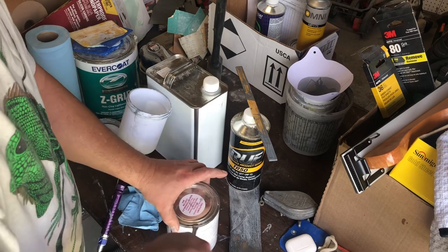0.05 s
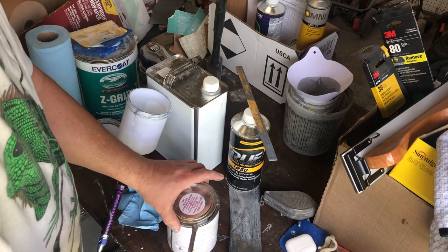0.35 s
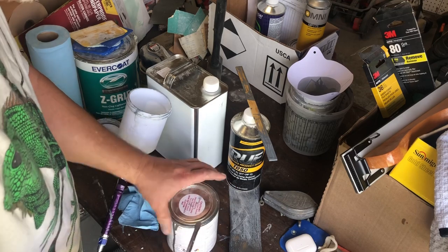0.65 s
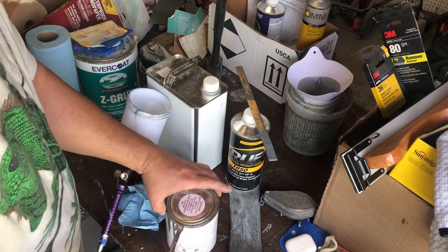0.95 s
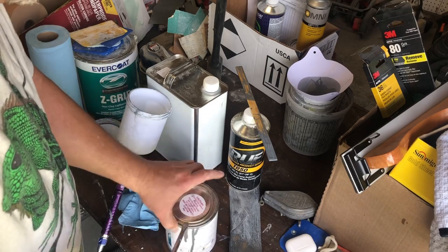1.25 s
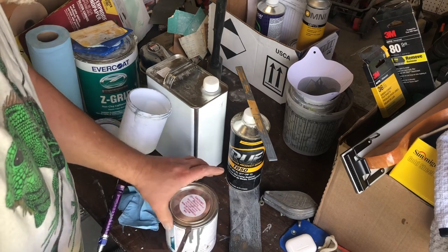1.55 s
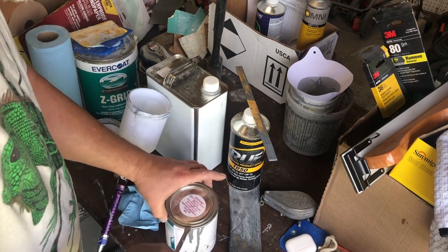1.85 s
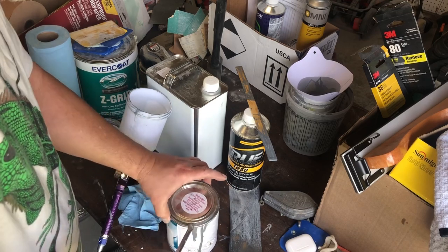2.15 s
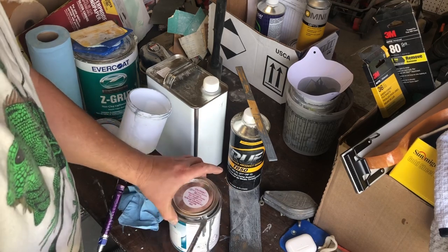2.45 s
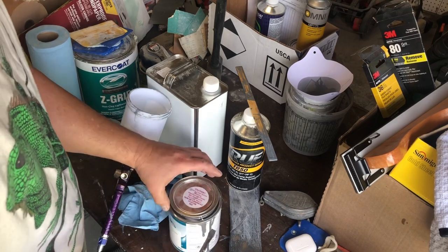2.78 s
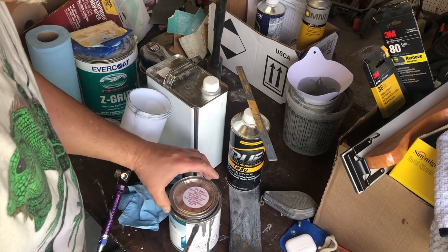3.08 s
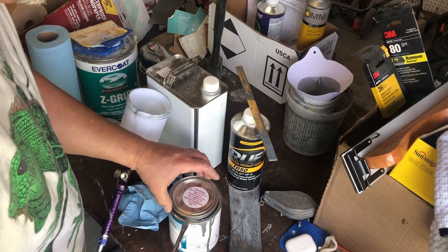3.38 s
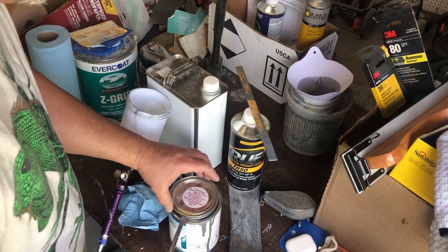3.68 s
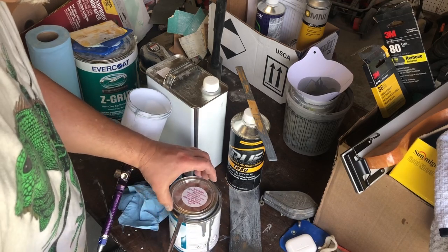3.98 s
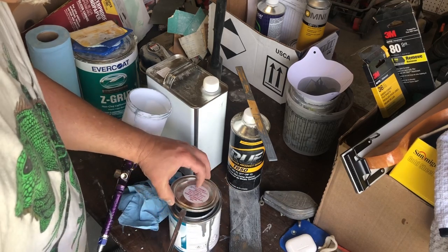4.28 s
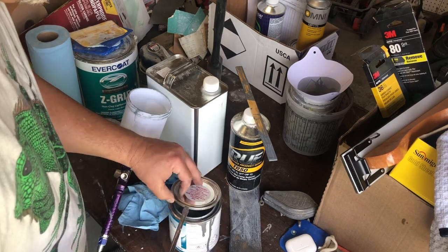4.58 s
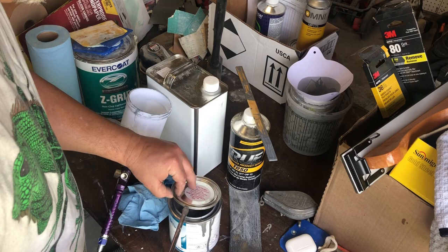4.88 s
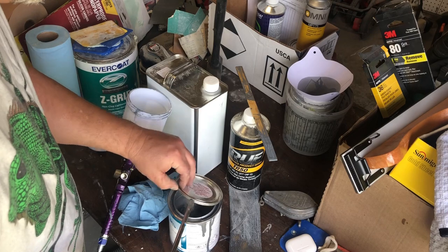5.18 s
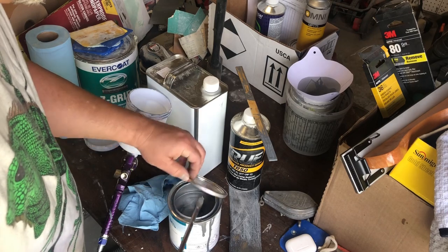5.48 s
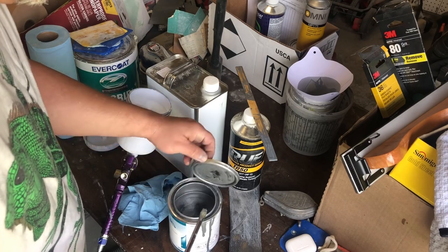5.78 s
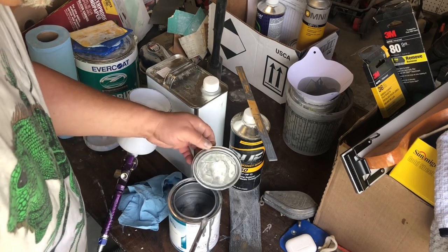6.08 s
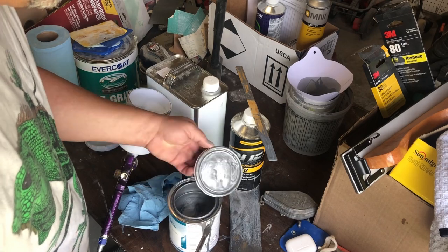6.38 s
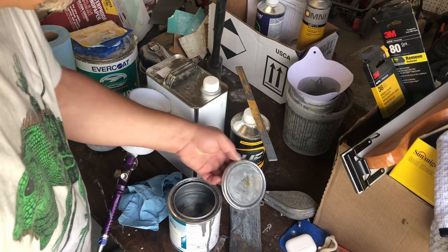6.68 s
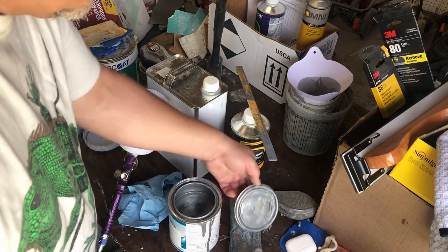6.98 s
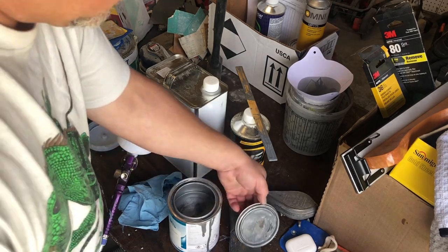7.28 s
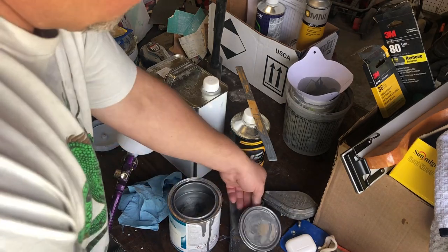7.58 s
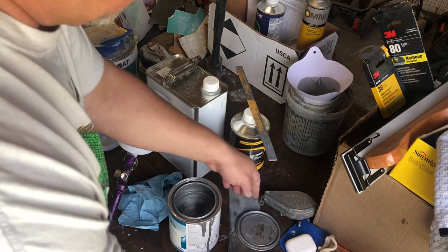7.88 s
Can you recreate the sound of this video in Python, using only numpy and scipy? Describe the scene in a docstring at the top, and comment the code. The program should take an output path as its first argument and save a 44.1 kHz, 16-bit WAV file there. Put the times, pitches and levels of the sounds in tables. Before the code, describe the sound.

Soft scrapes and bumps of a small tin on wood, a faint tacky crackle, then a metal lid clattering down.

```python
"""A small metal paint can is twisted round on a cluttered workbench, scraping and bumping on the wood.
Fingers slip and squeak on the tin as they work the sticky lid loose, and the tacky paint crackles.
The lid slides onto the bench and drops with a ringing clatter. A sleeve brushes softly, and the
open workshop adds a short echo over a quiet outdoor rumble."""
import sys
import numpy as np
from scipy import signal
from scipy.fft import rfft, irfft
from scipy.io import wavfile

SR = 44100
rng = np.random.default_rng(int(sys.argv[2]) if len(sys.argv) > 2 else 0)


def dump_mix(stems):
    """Bounce the given channels to the path in sys.argv[1] as a 16-bit WAV at rate SR."""
    frames = np.atleast_2d(stems).T  # one column per channel
    limited = np.clip(frames, -1, 1)  # hard clip at full scale
    pcm = np.round(limited * 32767).astype(np.int16)
    wavfile.write(sys.argv[1], SR, pcm)


N = 358974


def from_db(db):
    """Turn decibels into a gain to multiply by."""
    return 10 ** (np.asarray(db) / 20)


def unit_power(x):
    """Scale a sound so that its average power is one."""
    return x / np.sqrt(np.mean(x ** 2) + 1e-30)


def frequencies(size):
    """The frequencies in a sound of this many samples, kept above zero."""
    return np.maximum(np.arange(size // 2 + 1) * SR / size, 1)


def tone_curve(points, hz):
    """Gain at each frequency, along a line through (pitch_hz, level_db) points."""
    pitch_hz, level_db = np.transpose(points)
    return from_db(np.interp(np.log(hz), np.log(pitch_hz), level_db))


def resonances(peaks, hz):
    """Gain of an object that favours some pitches, given as (pitch_hz, width_hz, level_db)."""
    return np.sqrt(sum(from_db(db) ** 2 / (1 + ((hz ** 2 - pitch ** 2) / (hz * width)) ** 2)
                       for pitch, width, db in peaks))


def filtered(x, tone):
    """Give a steady sound a tone (a gain per frequency), at unit power."""
    return unit_power(irfft(rfft(x) * tone, len(x)))


def drift(per_s):
    """A random wander around zero, about one unit either way."""
    points = rng.standard_normal(4000)
    return np.interp(np.arange(N) / SR * per_s, np.arange(len(points)), points)


def add(out, start_s, sound):
    """Mix a sound in at a given time."""
    at = max(int(start_s * SR), 0)
    out[at:at + len(sound)] += sound[:max(N - at, 0)]


def onset(rise_s):
    """One second of gain that rises from zero as a sound begins."""
    return 1 - np.exp(-np.arange(SR) / SR / rise_s)


def gesture(start_s, length_s, swell_db, attack_s, fade_db_per_s):
    """Gain of one movement: it fades in, swells or sags while it lasts, then dies away."""
    t = np.arange(N) / SR - start_s
    db = swell_db * np.clip(t / length_s, 0, 1) - fade_db_per_s * np.maximum(t - length_s, 0)
    return np.clip(t / attack_s, 0, 1) * from_db(np.maximum(db, -200))


def friction(per_s, spread_db):
    """Rubbing surfaces make tiny catches of uneven size at random moments."""
    sizes = from_db(spread_db * np.minimum(rng.exponential(1, N), 4)) * rng.standard_normal(N)
    return sizes * (rng.random(N) < per_s / SR)


def noisy_ring(tone, ring_s, damping):
    """Countless close notes fade 60 dB in ring_s at 1 kHz; damping makes higher ones fade sooner."""
    out, t = 0, np.arange(SR) / SR
    octave = np.log2(frequencies(SR) / 1000)
    spectrum = rfft(filtered(rng.standard_normal(SR), tone))
    for k in range(-5, 5):
        band = irfft(spectrum * np.maximum(1 - abs(octave - k), 0), SR)
        decay = from_db(-60 * t * 2 ** (k * damping) / ring_s)
        share = np.std(band) * np.sqrt(np.mean(decay ** 2))
        out = out + share * unit_power(band * decay)
    return out * np.sqrt(ring_s * SR / np.log(1e6) / np.sum(out ** 2))   # starts near unit power


# the tone of still air: pitch_hz, level_db
AIR_TONE = [(15, -21.5), (25, -18), (59, 0), (123, -1), (242, -9.5), (503, -12.5), (1070, -18), (2840, -28),
            (3340, -27.5), (14400, -33), (16000, -35)]
# the deep notes of the far rumble: pitch_hz, width_hz, level_db
RUMBLE_PEAKS = [(57.9, 18, -2), (119, 9.2, 2), (164, 51, -7.5), (239, 4.9, 0), (288.5, 30, -8)]
def outdoors(air_db=-64.5, rumble_db=-66.5, waver_db=2.0, surge_db=-65.5):
    """Still air and a far, wavering rumble with one long surge."""
    hz = frequencies(N)
    low_cut = 1 / np.hypot(1, (36 / hz) ** 5)
    air = from_db(air_db) * filtered(rng.standard_normal(N), tone_curve(AIR_TONE, hz) * low_cut)
    far_tone = resonances(RUMBLE_PEAKS, hz) * low_cut / np.hypot(1, (hz / 400) ** 2)
    rumble = from_db(rumble_db + waver_db * drift(per_s=7.4)) * filtered(rng.standard_normal(N), far_tone)
    surge = gesture(start_s=4.95, length_s=1.38, swell_db=-3, attack_s=0.067, fade_db_per_s=17)
    drone = filtered(rng.standard_normal(N), resonances([(213, 100, 0)], hz) ** 2)
    return air + rumble + from_db(surge_db) * surge * drone


# the tone of the room's echo: pitch_hz, level_db
ECHO_TONE = [(100, -3), (500, -3.5), (2000, -7.5), (5000, -7), (10000, -7), (16000, -4)]
def workshop_echo(sound, ring_s=0.7):
    """Sound bounces off walls and clutter and blurs into a short tail."""
    echo = noisy_ring(tone_curve(ECHO_TONE, frequencies(SR)), ring_s, damping=0.043) * onset(0.008)
    return signal.fftconvolve(sound, echo / np.sqrt(np.sum(echo ** 2)))[:N]


# arm movements: start_s, length_s, level_db, swell_db
ARM_MOVES = [(0.695, 0.014, -66, -1.5), (1.62, 0.018, -62.5, -3), (3.412, 0.035, -63, -5),
             (5.138, 1.51, -68, -3.5), (6.767, 0.054, -67, -2.5), (7.091, 0.16, -57, -7.5)]
# the tone of rubbing cloth: pitch_hz, level_db
CLOTH_TONE = [(150, -17), (400, 7.5), (1000, 1), (2000, -1.5), (4000, -9.5), (8000, -22.5), (16000, -28)]
def sleeve():
    """Cloth brushes softly as the arm moves."""
    moves = sum(from_db(db) * gesture(start_s, length_s, swell_db, attack_s=0.01, fade_db_per_s=126.5)
                for start_s, length_s, db, swell_db in ARM_MOVES)
    return moves * filtered(friction(per_s=13000, spread_db=0), tone_curve(CLOTH_TONE, frequencies(N)))


# the notes of the lid held between fingers: pitch_hz, width_hz, level_db
HELD_LID_PEAKS = [(689, 31, 12.5), (1430, 540, 1), (2260, 230, -2), (3297, 87, 1), (4280, 360, -1),
                  (5140, 610, -3), (5600, 400, -5.5), (6830, 790, -3), (8570, 340, -1), (9730, 220, 0),
                  (10530, 330, -7), (12200, 390, 0), (12800, 1190, 1.5), (14200, 610, -3)]
def held_lid_tone(pitch_hz, width_octaves):
    """A touch brings out the held lid's notes around one pitch."""
    hz = frequencies(SR)
    band = np.exp(-0.5 * (np.log2(hz / pitch_hz) / width_octaves) ** 2)
    return resonances(HELD_LID_PEAKS, hz) * band / np.sqrt(hz)


# short rubs on the tin: middle_s, half_length_s, level_db, pitch_hz, width_octaves
FINGER_SLIPS = [(0.109, 0.011, -54.5, 3500, 1.7), (1.972, 0.022, -61.5, 12700, 3),
                (2.29, 0.014, -42, 3440, 1.6), (3.556, .008, -70, 8000, 1.1), (3.855, 0.018, -61, 4540, 2),
                (4.5, 0.0046, -67.5, 7000, 0.99), (5.068, 0.04, -71, 8000, 2),
                (5.269, 0.019, -60.5, 7000, 1.3), (5.565, 0.04, -70.5, 5500, 0.99),
                (5.716, 0.01, -70.5, 5500, 0.67), (5.926, 0.016, -58, 6000, 3.8),
                (6.487, 0.0064, -67.5, 5000, 1.5), (7.526, 0.017, -62, 3000, 4.3),
                (7.638, 0.046, -54, 2530, 1.6)]
def finger_slips():
    """Fingers and rim slip on the tin, each rub fading smoothly in and out."""
    out, t = np.zeros(N), np.arange(SR) / SR
    catches = friction(per_s=14000, spread_db=3)
    for middle_s, half_length_s, db, pitch_hz, width_octaves in FINGER_SLIPS:
        start_s = max(middle_s - 4 * half_length_s, 0)
        rub = filtered(np.roll(catches, -int(start_s * SR))[:SR], held_lid_tone(pitch_hz, width_octaves))
        fade = np.exp(-0.5 * ((t + start_s - middle_s) / half_length_s) ** 2)
        add(out, start_s, from_db(db) * rub * fade)
    return out


# sharp catches on the tin: start_s, level_db, pitch_hz, width_octaves
TIN_TICKS = [(0.1027, -46, 8700, 0.42), (0.446, -44.5, 6500, 1.6), (0.568, -50, 12000, 1.5),
             (1.4955, -64, 11900, .7), (1.98, -50, 5000, 2.8), (2.2964, -34, 5660, .6),
             (2.4243, -44, 3600, 0.99), (5.4025, -45.5, 5830, 0.91), (7.21, -49.5, 3400, 1)]
def tin_ticks():
    """The rim or a fingernail catches, and the tin rings for an instant."""
    out = np.zeros(N)
    for start_s, db, pitch_hz, width_octaves in TIN_TICKS:
        tick = noisy_ring(held_lid_tone(pitch_hz, width_octaves), ring_s=0.022, damping=0.05)
        add(out, start_s, from_db(db) * tick * onset(0.00043))
    return out


# two-note fingertip squeaks: start_s, length_s, level_db, low_hz, high_hz
TIN_SQUEAKS = [(2.423, 0.0031, -47.5, 1940, 4290), (5.401, .009, -61, 4100, 5000),
               (5.888, 0.054, -58.5, 855, 5160)]
def hum_and_squeaks(hum_db=-71.5, hum_hz=734, hum_width_hz=30, squeak_width_hz=260):
    """Rubbing makes the tin sing: it hums as the lid comes loose and squeaks under a fingertip."""
    hz = frequencies(N)
    catches = friction(per_s=3100, spread_db=5)
    hum = filtered(catches, resonances([(hum_hz, hum_width_hz, 0)], hz))
    loosening = gesture(start_s=4.47, length_s=0.37, swell_db=-2, attack_s=0.08, fade_db_per_s=75)
    out = from_db(hum_db) * hum * loosening
    for start_s, length_s, db, low_hz, high_hz in TIN_SQUEAKS:
        tone = resonances([(low_hz, squeak_width_hz, -1), (high_hz, squeak_width_hz, 0)], hz) ** 2
        press = gesture(start_s, length_s, swell_db=3.5, attack_s=length_s / 2, fade_db_per_s=1500)
        out += from_db(db) * filtered(catches, tone) * press
    return out


# how the peeling rises and falls: time_s, relative_level_db
PEEL_LEVELS = [(4.19, -90), (4.202, -70), (4.452, -77.5), (4.504, -76), (4.51, -79), (4.654, -67.5),
               (4.688, -77), (4.948, -69.5), (5.0, -82)]
# the tone of tacky paint: pitch_hz, level_db
PAINT_TONE = [(400, -30), (650, 0), (735, 14), (850, -6), (1100, -6), (2500, -7), (5600, -13), (8000, -11),
              (12000, -14), (16000, -16)]
# the lid's notes while paint still holds its rim: pitch_hz, width_hz, level_db
STUCK_LID_PEAKS = [(3390, 100, -6.5), (4340, 53, -0.5), (4840, 180, -2), (5560, 120, 3.5), (6850, 150, -1),
                   (8410, 230, -9), (10000, 430, -10.5), (11900, 240, -5.5), (13900, 240, -3)]
def lid_peel(boost_db=4, judder_db=4, tin_db=11, patchy_db=4):
    """Threads of paint snap in a fine crackle whose tone keeps shifting as the lid peels free."""
    hz, crackle = frequencies(N), 0
    tone = tone_curve(PAINT_TONE, hz) * (1 + from_db(tin_db) * resonances(STUCK_LID_PEAKS, hz))
    spectrum = rfft(filtered(friction(per_s=7000, spread_db=1.8), tone))
    for k in range(-3, 10):   # each half octave wavers on its own
        half_octave = np.maximum(1 - abs(2 * np.log2(hz / 1000) - k), 0)
        crackle = crackle + irfft(spectrum * half_octave, N) * from_db(patchy_db * drift(per_s=18))
    times_s, levels_db = np.transpose(PEEL_LEVELS)
    times_s = np.r_[times_s[0] - 0.03, times_s, times_s[-1] + 0.03]   # room to fade at both ends
    peel_db = np.interp(np.arange(N) / SR, times_s, np.r_[-120, levels_db, -120])
    return from_db(peel_db + boost_db - judder_db * drift(per_s=59)) * unit_power(crackle)


# the tone of the rim scratching on wood: pitch_hz, level_db
SCRATCH_TONE = [(290, -41), (500, -15.5), (708, -8), (1020, -21), (1640, -12), (3750, -6), (4730, -11.5),
                (7210, -11.5), (10800, -14), (16000, -22.5)]
def lid_slide(level_db=-55, judder_db=3, ring_db=6):
    """The rim scratches over the bench in small jerks, and the lid's longest notes sing along."""
    hz = frequencies(N)
    long_notes = [(pitch_hz, 8 / ring_s, 0) for pitch_hz, _, _, ring_s in LID_NOTES if ring_s > 0.075]
    tone = tone_curve(SCRATCH_TONE, hz) * (1 + from_db(ring_db) * resonances(long_notes, hz))
    scratch = filtered(friction(per_s=13000, spread_db=2), tone)
    push = gesture(start_s=7.222, length_s=0.13, swell_db=4, attack_s=0.033, fade_db_per_s=219)
    return from_db(level_db + judder_db * drift(per_s=110)) * push * scratch


# can and lid bumping the bench, the lid popping loose and knocking in the fingers:
# start_s, thud_db, low_hz, high_hz, shake_vs_thud_db, knock_hz, knock_db
THUDS_AND_KNOCKS = [(0.021, -58, 290, 600, -4, 570, -53), (0.103, -54, 250, 1800, -20, 396, -45.5),
                    (0.447, -43, 141, 1740, -5, 147, -34), (1.498, -42.5, 150, 1370, -17, 576, -38.5),
                    (1.93, -49.5, 130, 1120, -8.5, 160, -52), (2.2947, -28, 213, 704, -20, 301, -20),
                    (2.296, -28.5, 1210, 2220, -18.5, 727, -29), (2.309, -28, 190, 910, -19.5, 218, -24.5),
                    (2.3288, -43, 200, 1200, -14, 304, -33), (2.897, -56.5, 247, 2220, -11.5, 565, -54),
                    (3.4702, -51, 450, 930, -26, 516, -44), (3.601, -51.5, 400, 1460, -26, 265.5, -31),
                    (4.202, -58, 298, 1660, 6.5, 1220, -48), (5.404, -62, 600, 1500, -6, 980, -48),
                    (5.715, -56, 740, 940, -16, 893, -48.5), (7.4672, -38.5, 600, 1500, -16.5, 692, -37),
                    (7.608, -45.5, 130, 800, -20, 200, -53.5), (7.651, -34, 1000, 3500, -1.5, 295, -31),
                    (7.717, -43.5, 160, 400, -10.5, 217, -44), (7.786, -33.5, 142, 270, -30, 248, -29.5),
                    (7.803, -37.5, 190, 287, -8, 242, -53), (7.951, -44.5, 139.4, 173, -18, 150, -37.5)]
# the tone shared by the thuds: pitch_hz, level_db
THUD_TONE = [(100, 0), (170, -0.5), (230, 1.5), (310, -3.5), (420, 2), (560, -7.5), (750, -2), (1050, -6.5),
             (1400, -6), (1750, -6), (3000, -10.5), (8000, -3.5), (16000, -20)]
def thuds_and_knocks(knock_ring_s=0.048):
    """Each bump or pop gives a thud, a lingering shake and the hollow knock of one swinging panel."""
    out, t, hz = np.zeros(N), np.arange(SR) / SR, frequencies(SR)
    for start_s, thud_db, low_hz, high_hz, shake_db, knock_hz, knock_db in THUDS_AND_KNOCKS:
        band = 1 / np.hypot(1, (low_hz / hz) ** 3) / np.hypot(1, (hz / high_hz) ** 2.5)
        tone = tone_curve(THUD_TONE, hz) * band
        thud = noisy_ring(tone, ring_s=0.058, damping=0.23)
        shake = from_db(shake_db) * noisy_ring(tone, ring_s=0.54, damping=0.1)
        add(out, start_s, from_db(thud_db) * (thud + shake) * onset(0.00098))
        knock = np.sin(2 * np.pi * knock_hz * t) * from_db(-60 * t / knock_ring_s)
        add(out, start_s, from_db(knock_db) * knock * onset(0.0012) ** 2)
    return out


# pushes that turn the can: start_s, length_s, level_db, swell_db, relative_hiss_db
CAN_PUSHES = [(0.347, 0.041, -54, 1.5, -8.5), (0.43, 0.039, -52, -8, -1), (0.953, 0.067, -50, 1, -9),
              (1.076, 0.21, -51, 1, -4.5), (2.095, 0.14, -59, 6.5, -9)]
# the tone of its base grinding on wood: pitch_hz, level_db
GRIND_TONE = [(71, -33), (120, -8), (188, -12), (301, 4.5), (773, -0.5), (1090, -2.5), (1240, -0.5),
              (1860, -6.5), (5300, -15), (7050, -25.5), (14700, -21.5), (16000, -23)]
# the notes of the can's body: pitch_hz, width_hz, level_db
CAN_PEAKS = [(790, 11, -9), (926, 37, -17), (1235, 12, -6.5), (1662, 26, -4.5), (2130, 48, -8),
             (2584, 55, -5), (3235, 51, -9.5), (4160, 29, -10), (5350, 120, -15), (5920, 140, -17),
             (8000, 230, -17), (9150, 140, -19)]
def can_twists(body_db=11, hiss_above_hz=6500, hiss_trim_db=-2, judder_db=1.44):
    """Grit under the turning base makes the can ring; fine hiss peaks mid-push, where it turns fastest."""
    out, t, hz = np.zeros(N), np.arange(N) / SR, frequencies(N)
    tone = tone_curve(GRIND_TONE, hz) * (1 + from_db(body_db) * resonances(CAN_PEAKS, hz))
    treble = 1 / np.hypot(1, (hiss_above_hz / hz) ** 4)
    grit = friction(per_s=14000, spread_db=1.5)
    grind = filtered(grit, tone * np.sqrt(1 - treble ** 2))
    hiss = filtered(grit, tone * treble)
    for start_s, length_s, db, swell_db, hiss_db in CAN_PUSHES:
        push = gesture(start_s, length_s, swell_db, attack_s=0.03, fade_db_per_s=110)
        effort = push / push.max()
        progress = (t - start_s) / length_s
        arch_db = -17 * np.minimum((progress - 0.52) ** 2, 0.5)
        hiss_gain = from_db(hiss_trim_db + hiss_db + arch_db) * effort ** 0.97
        out += from_db(db) * push.max() * (effort * grind + hiss_gain * hiss)
    return out * from_db(judder_db * drift(per_s=44))


# the lid's landings: start_s, ring_db, clack_db, cutoff_hz, place (0 is the rim, 1 the face)
LID_LANDINGS = [(7.6004, -58, -29.5, 6800, 0.31), (7.648, -15, -14, 9030, 0.02),
                (7.6804, -35, -19.5, 14130, .5), (7.712, -19, -34, 3990, 0.65),
                (7.7178, -20, -19.5, 12000, 0.88), (7.7824, -31, -24.5, 12100, 1),
                (7.8471, -39.5, -32, 13900, 0.97)]
# the free lid's notes: pitch_hz, rim_hit_db, face_hit_db, ring_s (time to fade 60 dB)
LID_NOTES = [(716, -21.5, -18.5, 0.37), (1004, -24.5, -31, .05), (1110, -25.5, -23.5, 0.2),
             (1270, -24.5, -28.5, 0.039), (1300, -40, -26.5, 0.28), (1465, -4.5, -5.5, 0.024),
             (1583, -32.5, -14.5, 0.31), (1594, -11.5, -12.5, 0.058), (1692, -10.5, -23, 0.12),
             (1970, -9.5, -6.5, .04), (2140, -4.5, -16.5, .05), (2264, 8, -10, 0.017),
             (2190, -23, -13, 0.065), (2355, -12.5, -14, 0.2), (2387, 3.5, -10, 0.044),
             (2640, -25.5, -24.5, 0.13), (2980, -14, -23.5, 0.027), (3460, -18, -16.5, 0.026),
             (3416, -7, -11.5, 0.056), (3644, 6, -17.5, 0.016), (3510, -16, -28.5, .08),
             (4290, -9.5, -17.5, 0.07), (4240, -24, -23.5, 0.047), (5300, -10, -19.5, 0.029),
             (5130, -15.5, -29.5, 0.076), (5950, -14, -21, 0.046), (7700, -19, -25.5, .04),
             (6980, 3, -17.5, .019), (9650, 1.5, -26, 0.014)]
# the tone of tin hitting wood: pitch_hz, level_db
CLACK_TONE = [(300, -15.5), (900, -9.5), (1400, -8.5), (1900, -17), (2600, 2), (3100, -11.5), (3900, -3.5),
              (5600, -9), (8400, -11), (10200, -10.5), (11200, -16), (13000, -13), (16000, -21)]
def lid_clatter(scatter_db=2.9, shimmer_db=-15.5, lies_flat_s=7.715):
    """Each landing clacks and sets the lid ringing; where it is struck decides the mix of notes."""
    out, t, hz = np.zeros(N), np.arange(SR) / SR, frequencies(SR)
    pitch_hz, rim_db, face_db, ring_s = np.transpose(LID_NOTES)
    waves = np.sin(2 * np.pi * pitch_hz[:, None] * t)
    signs = (-1) ** np.arange(len(pitch_hz))
    flat_ring_s = 0.17 * (pitch_hz[:, None] / 1000) ** 2   # the bench stops a flat lid's low notes first
    for start_s, ring_db, clack_db, cutoff_hz, place in LID_LANDINGS:
        time_flat_s = np.maximum(t - max(lies_flat_s - start_s, 0), 0)
        notes = waves * from_db(-60 * (t / ring_s[:, None] + time_flat_s / flat_ring_s))
        note_db = rim_db + place * (face_db - rim_db) + scatter_db * rng.standard_normal(len(pitch_hz))
        strengths = from_db(ring_db + note_db) * signs / np.hypot(1, (pitch_hz / cutoff_hz) ** 2)
        tone = tone_curve(CLACK_TONE, hz) / np.hypot(1, (hz / cutoff_hz) ** 2)
        clack = from_db(clack_db) * noisy_ring(tone, ring_s=0.014, damping=0.052)
        shimmer = from_db(ring_db + shimmer_db) * noisy_ring(tone, ring_s=0.1, damping=0.34)
        add(out, start_s, (strengths @ notes + shimmer + clack) * onset(0.00044))
    return out


def scene(lid_echo_db=-23, can_echo_db=-11):
    """Mix the lid and can with their echo, the sleeve and the outdoors, in one channel."""
    lid = lid_clatter() + lid_slide() + lid_peel() + hum_and_squeaks() + finger_slips() + tin_ticks()
    can = can_twists() + thuds_and_knocks()
    echo = workshop_echo(from_db(lid_echo_db) * lid + from_db(can_echo_db) * can)
    return (lid + can + echo + sleeve() + outdoors())[None]


def record(dry):
    """A small microphone drops the deepest bass; the highest treble is cut steeply."""
    bass_cut = signal.butter(3, 38, "high", fs=SR, output="sos")
    treble_cut = signal.ellip(10, 0.2, 80, 15900, fs=SR, output="sos")
    return signal.sosfilt(treble_cut, signal.sosfilt(bass_cut, dry))


dry = scene()
out = record(dry)
dump_mix(out)
```